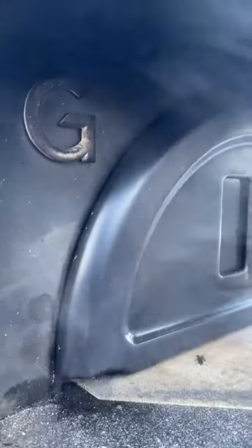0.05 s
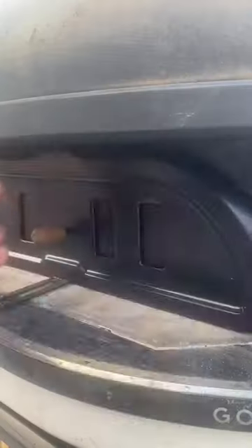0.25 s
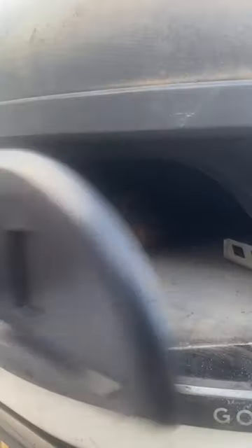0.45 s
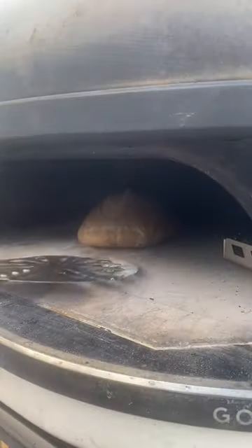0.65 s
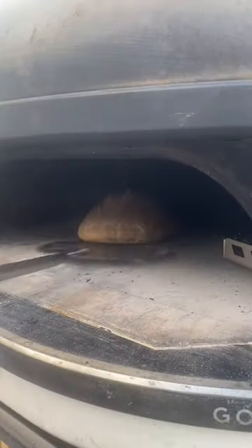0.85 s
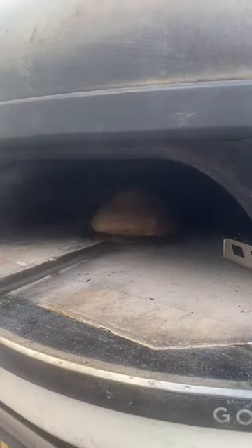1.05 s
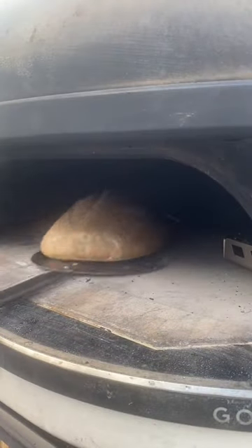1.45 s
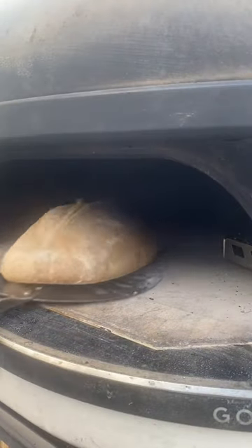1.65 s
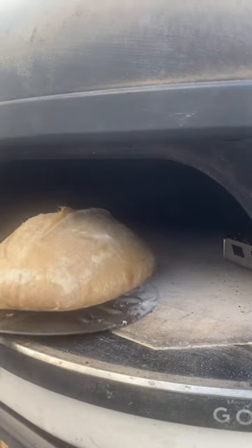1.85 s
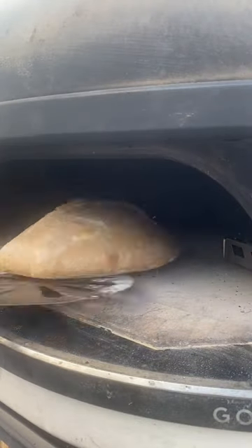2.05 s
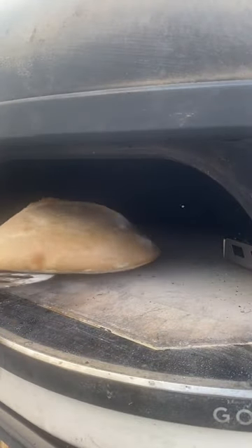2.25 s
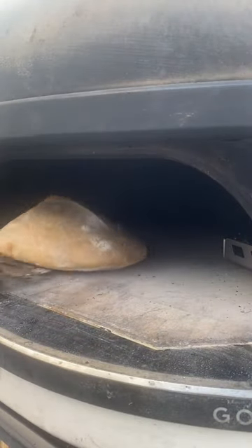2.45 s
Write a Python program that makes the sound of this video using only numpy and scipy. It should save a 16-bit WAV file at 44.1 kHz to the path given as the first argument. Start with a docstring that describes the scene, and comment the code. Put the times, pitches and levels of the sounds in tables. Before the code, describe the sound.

Close to an outdoor oven's mouth, metal rasps over stone: first the door, slipping free with a knock and hollow boom, then a peel that slides in, rattles and scrapes back out with bread, cracking crumbs over a low rumble.

```python
"""A sheet-metal door rasps off the stone mouth of an outdoor oven, slips free and rings as it lifts away.
At 0.5 s a metal peel touches down with a faint ring and hisses in over the stone floor.
Around 1.2 s it rattles under a loaf, then drags it out, cracking crumbs and squeaking briefly.
All along, the oven's hollow shell rumbles and booms under the blows, over a low murmur of air;
two closely spaced microphone ports listen at its mouth."""
import sys
import numpy as np
from scipy import signal
from scipy.fft import rfft, irfft
from scipy.io import wavfile
from scipy.ndimage import uniform_filter1d, map_coordinates

SR = 44100
rng = np.random.default_rng(int(sys.argv[2]) if len(sys.argv) > 2 else 0)


def file_out(sig):
    """Save sig as 16-bit WAV at sys.argv[1]."""
    # one column per channel
    cols = np.atleast_2d(sig).T
    # limit, then scale
    lim = np.clip(cols, -1, 1)
    pcm = np.round(lim * 32767).astype(np.int16)
    wavfile.write(sys.argv[1], SR, pcm)


N = 110250
FFT_SIZE = 2 ** 17

# tone of the outdoor air: freq_hz, gain_db
AIR_EQ = [(20, -11.5), (55, 0), (130, -5.5), (300, -14.5), (900, -16.5), (2500, -37.5), (16000, -57)]
# the shell's rumble under the sliding: time_s, level_db
RUMBLE = [(.18, -64.5), (.26, -35.5), (.36, -49.5), (.39, -25.5), (.44, -30.5), (.5, -49), (.58, -46.5),
          (.66, -75), (.76, -60.5), (.85, -50), (1.0, -42.5), (1.1, -61.5), (1.15, -56), (1.23, -42.5),
          (1.33, -39), (1.43, -54.5), (1.55, -56), (1.62, -46), (1.82, -50), (2.0, -61.5), (2.5, -55)]
# heavy blows on the shell: start_s, level_db
THUDS = [(.392, -13.5), (.426, -22.5), (0.98, -27), (1.304, -31.5), (1.594, -34), (1.689, -30.5),
         (1.814, -45)]
# the shell's boom: pitch_hz, gain_db, t60_s
SHELL_RING = [(94.5, -5, 0.17), (134.3, -20, 0.19), (168.7, 1.5, 0.15), (189.5, -12.5, 0.18)]

# light sliding before the door is pulled: start_s, end_s, level_db
FIRST_SLIDE = (0.0, 0.39, -51)
# door dragging on stone: time_s, rasp_db, grind_db
DOOR_DRAG = [(0.19, -54.5, -59.5), (0.206, -39, -46.5), (0.238, -33, -41), (0.256, -26.5, -31.5),
             (0.3, -23.5, -33), (0.358, -16, -42.5), (0.372, -31.5, -39.5), (0.39, -19, -20),
             (0.409, -34, -34.5), (0.427, -23, -30), (0.445, -36.5, -36.5), (0.52, -63.5, -60)]
# bright rasp of the door's edge: freq_hz, gain_db
DOOR_RASP_EQ = [(600, -20.5), (1700, -10.5), (2200, -1), (3000, -1), (3800, -0.5), (4800, -5.5), (7000, -8),
                (10500, -14.5), (12500, -23), (16000, -30.5)]
# low grind of its panel: freq_hz, gain_db
DOOR_GRIND_EQ = [(100, -32), (260, -6), (600, -7), (1100, -8), (1700, -2), (2400, -11), (5000, -37.5)]
# sheet-metal resonances: freq_hz, width_hz, boost_db
DOOR_MODES = [(1020, 21, 12.2), (1253, 19, 9.9), (2114, 150, 2.6), (2940, 79, 6), (3565, 46, 7),
              (3650, 46, 3.4), (3950, 17, 8.4), (4350, 87, 3.9), (7000, 79, 3.9)]
# door knocks: start_s, level_db, t60_s
DOOR_KNOCKS = [(.078, -36, 0.084), (.202, -24.5, 0.033), (.3612, -7, 0.012), (.3935, -17.5, 0.022),
               (.4215, -17.5, 0.029)]
# tone of those knocks: freq_hz, gain_db
DOOR_KNOCK_EQ = [(100, -14), (700, -4.5), (1800, -1.5), (3000, -3.5), (4500, -9.5), (6000, 0),
                 (10000, -3.5), (15000, -18)]
# shriek of the edge slipping free: pitch_hz, level_db, t60_s
RELEASE_RING = [(2920, 3, 0.009), (3170, -13, 0.022), (2256, -18, .025)]
# door ringing in the hand: pitch_hz, level_db, t60_s
LIFT_RING = [(1020, -55.5, 0.81), (1560, -40.5, .22), (1950, -33, 0.18)]

# empty peel touching down: pitch_hz, level_db, t60_s
TOUCH_RING = [(237, -51, .5), (818, -58, 1.1), (1880, -60, 1.0), (3260, -57, 1.5), (4070, -55, 1.3)]
# peel going in: time_s, hiss_db, rasp_db
PEEL_PUSH = [(0.525, -48, -72), (0.537, -44.5, -55.5), (0.65, -42.5, -54.5), (0.72, -37, -59.5),
             (0.764, -29, -50), (0.773, -33, -31.5), (0.83, -29.5, -28.5), (0.9, -31.5, -28.5),
             (0.93, -36, -37.5), (0.99, -38.5, -41.5), (1.03, -53.5, -48.5), (1.08, -85, -82)]
# bright hiss of the skimming blade: freq_hz, gain_db
PUSH_HISS_EQ = [(800, -35), (2500, -12), (4000, -8), (5200, -2), (6800, -2), (8500, -3), (10900, -5),
                (11900, -13), (15500, -16)]
# rasp of the biting blade: freq_hz, gain_db
PUSH_RASP_EQ = [(150, -47), (400, -11), (1100, -11), (1650, -4), (2300, 2), (3800, 2), (5000, -0.5),
                (8000, -31)]
# empty blade's resonances: freq_hz, width_hz, boost_db
EMPTY_PEEL_MODES = [(470, 40, 8), (1672, 45, 5), (2760, 70, 3), (3400, 90, 3), (6050, 110, 4)]

# peel knocks: start_s, level_db, t60_s
PEEL_KNOCKS = [(.975, -40, 0.21), (1.160, -37.5, 0.081), (1.195, -41.5, .04), (1.217, -34, 0.062),
               (1.241, -33.5, 0.046), (1.266, -31.5, 0.026), (1.298, -31, 0.11), (1.362, -41.5, 0.08),
               (1.458, -41, 0.087), (1.537, -44, 0.091), (2.05, -39.5, 0.022)]
# tone of those knocks: freq_hz, gain_db
PEEL_KNOCK_EQ = [(100, -4), (400, 2), (820, 4.5), (1120, -0.5), (1650, 4), (3000, -4.5), (7000, -9.5),
                 (15000, -40)]
# blade chattering under the loaf: start_s, end_s, bounce_db
RATTLE = (1.205, 1.325, -42)
# blade's hollow ring, relative to its knock: pitch_hz, gain_db, t60_s
BLADE_RING = [(452, -9, 0.13), (733, -5.5, 0.15), (858, -8, .12)]
# loaded peel coming out: time_s, hiss_db, grind_db
PEEL_PULL = [(1.152, -86, -100), (1.163, -58, -47), (1.268, -46.5, -45.5), (1.282, -50.5, -62),
             (1.32, -40, -44), (1.345, -46.5, -51), (1.401, -42, -57), (1.458, -41.5, -49.5),
             (1.508, -42, -52.5), (1.556, -43, -43.5), (1.598, -36.5, -49), (1.699, -39, -51),
             (1.8, -39.5, -46.5), (1.934, -40.5, -42.5), (2.014, -50.5, -70), (2.057, -40.5, -49),
             (2.086, -54, -51), (2.108, -44.5, -40), (2.15, -36, -44.5), (2.189, -41.5, -50.5),
             (2.29, -35, -40.5), (2.382, -34.5, -42.5), (2.429, -42.5, -41.5), (2.495, -34, -38)]
# hiss of metal drawn over stone: freq_hz, gain_db
PULL_HISS_EQ = [(900, -30), (2200, -6), (4500, -.5), (7000, -1), (10700, -5), (12300, -15), (15500, -19)]
# grind under the loaf's weight: freq_hz, gain_db
PULL_GRIND_EQ = [(120, -25.5), (300, -7), (800, -0.5), (1500, 2), (2200, 2.5), (4000, -6), (8000, -46)]
# loaded blade's resonances: freq_hz, width_hz, boost_db
LOADED_PEEL_MODES = [(490, 70, 7), (733, 46, 7), (1610, 74, 3), (4420, 450, 4), (7000, 350, 2.5)]
# crumbs cracking under the blade: start_s, level_db, t60_s
CRUMBS = [(1.366, -27.5, 0.024), (1.494, -27, 0.017), (1.7445, -20.5, 0.012), (2.095, -32, 0.02)]
# the blade catching and singing: peak_s, level_db, half_length_s, pitch_hz
SQUEAKS = [(0.736, -53, 0.027, 454), (1.673, -42.5, 0.045, 4460), (2.105, -33.5, 0.0066, 5350),
           (2.14, -33, 0.012, 5426), (2.216, -37.5, 0.0051, 5390), (2.228, -40.5, 0.01, 1620),
           (2.385, -39.5, 0.0069, 3130), (2.457, -42, 0.025, 2750)]
# partials of a squeak: pitch_ratio, width_hz, gain_db
SQUEAK_PARTIALS = [(1.001, 124, -2.5), (1.219, 145.5, -7), (1.86, 396, -20)]

# phase between the ports: freq_hz, left_lead_rad
PORT_PHASE = [(120, 0), (400, -.3), (780, -.55), (1500, 0), (2000, .05), (2800, .75), (3800, .4),
              (4900, 1.9), (5600, 1.6), (7000, 2.3), (8100, np.pi), (12600, np.pi), (14000, 3.9),
              (15100, 6.1)]
# stereo balance: freq_hz, left_over_right_db
BALANCE = [(150, 0), (600, 2), (1600, 0), (2900, -2), (5600, .4), (7800, 0)]
# stereo width, with almost no diffuse sound from 8.4 to 12 kHz: freq_hz, diffuse_over_direct_db
STEREO_WIDTH = [(130, -32), (500, -16), (1000, -16), (1800, -18), (2800, -9), (5500, -4), (7300, -8),
                (8400, -45), (12000, -45), (13800, -2), (15500, -10)]

AIR_DB, THUD_ATTACK_S = -58, .011
RELEASE_S, LIFT_S = .3612, .43
TOUCH_S, TOUCH_WAVER_DB = .535, 3
CAVITY_T60_S, DRIFT_PER_S = .075, 14
LOW_CUT_HZ, TOP_HZ = 24, 15800


def amp(db):
    """Decibels to gain."""
    return 10 ** (np.asarray(db) / 20)


def unit(x):
    """Scale to rms 1."""
    return x / np.sqrt(np.mean(x ** 2) + 1e-20)


def clock():
    """Time of each sample."""
    return np.arange(N) / SR


def bin_hz():
    """Frequency of each filter bin."""
    return np.fft.rfftfreq(FFT_SIZE, 1 / SR)


def curve(points):
    """(freq_hz, value) points joined on a log axis."""
    hz, values = np.transpose(points)
    return np.interp(np.log(bin_hz() + 1), np.log(hz + 1), values)


def faders(rows):
    """One gain envelope per dB column, silent outside the rows."""
    times, *columns = np.transpose(rows)
    return [amp(np.interp(clock(), times, db, left=-120, right=-120)) for db in columns]


def wobble(rate):
    """A smooth random curve, rate knots a second."""
    return map_coordinates(rng.standard_normal(4096), [clock() * rate], mode="wrap")


def body(x, eq, modes=()):
    """A ringing body: a broad EQ with resonances standing out of it; rms 1."""
    peaks = sum((amp(db) ** 2 - 1) / (1 + (2 * (bin_hz() - hz) / width) ** 2) for hz, width, db in modes)
    gain = amp(curve(eq)) * np.sqrt(1 + peaks)
    cepstrum = irfft(np.log(np.maximum(np.nan_to_num(gain), 1e-6)))
    cepstrum[1:FFT_SIZE // 2] *= 2  # minimum phase: the ring follows the hit
    cepstrum[FFT_SIZE // 2 + 1:] = 0
    return unit(irfft(rfft(x, FFT_SIZE) * np.exp(rfft(cepstrum)))[:N])


def friction(rate, spread_db, flutter_db, flutter_rate):
    """Tiny slips of metal over grit, about rate a second, bunched by an uneven grip."""
    slips = (rng.random(N) < rate / SR) * rng.choice([-1, 1], N)
    sizes = amp(spread_db * rng.standard_normal(N).clip(-2, 1))
    grip = amp(flutter_db * wobble(flutter_rate).clip(-2, 1))
    return unit(slips * sizes * grip)


def travel(x, depth_db):
    """A moving contact favours ever different plate modes; rms 1."""
    spectra = signal.stft(x, SR, nperseg=1024)[2]
    shimmer = uniform_filter1d(rng.standard_normal(spectra.shape), size=3, axis=0)
    shimmer = unit(uniform_filter1d(shimmer, size=6, axis=1))
    return unit(signal.istft(spectra * amp(depth_db * shimmer), SR, nperseg=1024)[1][:N])


def decay(start, t60, attack_s):
    """Envelope of a blow."""
    age = np.maximum(clock() - start, 0)
    return 10 ** (-3 * age / t60) * (1 - np.exp(-age / attack_s))


def knocks(rows, eq, modes):
    """Short gritty contacts ringing a body."""
    envelope = sum(amp(db) * decay(start, t60, attack_s=.0018) for start, db, t60 in rows)
    force = envelope * rng.standard_normal(N)
    return np.std(force) * body(force, eq, modes)


def ring(start, modes, attack_s):
    """Damped modes set off by one blow."""
    age = clock() - start
    return sum(amp(db) * decay(start, t60, attack_s) * np.sin(2 * np.pi * hz * age)
               for hz, db, t60 in modes)


def air():
    """A low, steady bed of outdoor air."""
    return amp(AIR_DB) * body(rng.standard_normal(N), AIR_EQ)


def shell():
    """The hollow oven rumbles under the sliding and booms at the heavier blows."""
    level, = faders(RUMBLE)
    hollow_eq = [(25, -53.5), (60, -5), (95, -10), (130, 7), (165, -1.5), (200, -8), (250, -21),
                 (500, -50.5)]
    rumble = level * body(rng.standard_normal(N), hollow_eq)
    booms = sum(amp(db) * ring(start, SHELL_RING, THUD_ATTACK_S) for start, db in THUDS)
    return rumble + booms


def first_slide():
    """A faint even hiss of metal easing over the stone."""
    start, end, db = FIRST_SLIDE
    held = np.interp(clock(), [start, end, end + .03], [1, 1, 0])
    slips = friction(rate=26000, spread_db=1.5, flutter_db=1.8, flutter_rate=130)
    return amp(db) * held * body(slips, PULL_HISS_EQ)


def door():
    """The door's edge rasps ever harder over the stone, slips free, knocks and rings on."""
    rasp, grind = faders(DOOR_DRAG)
    fine = friction(rate=10000, spread_db=1, flutter_db=1, flutter_rate=220)
    coarse = friction(rate=2000, spread_db=2.5, flutter_db=0, flutter_rate=150)
    edge = rasp * travel(body(fine, DOOR_RASP_EQ, DOOR_MODES), depth_db=2.4)
    panel = grind * travel(body(coarse, DOOR_GRIND_EQ, DOOR_MODES), depth_db=5.5)
    bumps = knocks(DOOR_KNOCKS, DOOR_KNOCK_EQ, DOOR_MODES)
    shriek = ring(RELEASE_S, RELEASE_RING, attack_s=.001)
    lift = ring(LIFT_S, LIFT_RING, attack_s=.002)
    return edge + panel + bumps + shriek + lift


def squeaks():
    """Now and then the blade catches and sings in narrow bands of noise."""
    f, out = bin_hz(), np.zeros(N)
    for peak, db, half_length, hz in SQUEAKS:
        response = sum(amp(gain_db) * 1j * f * width / ((ratio * hz) ** 2 - f * f + 1j * f * width)
                       for ratio, width, gain_db in SQUEAK_PARTIALS)
        tone = signal.hilbert(irfft(rfft(rng.standard_normal(FFT_SIZE)) * response))[:N]
        compressed = unit(tone.real / np.sqrt(abs(tone)))
        swell = np.exp(-.5 * ((clock() - peak) / half_length) ** 2)
        out += amp(db) * swell * compressed
    return out


def rattle(count, detune):
    """Each knock and each small bounce under the loaf rings the blade a little differently."""
    start, end, bounce_db = RATTLE
    times = start + (end - start) * (np.arange(count) + rng.random(count)) / count
    hits = [row[:2] for row in PEEL_KNOCKS] + [(time, bounce_db) for time in times]
    out = np.zeros(N)
    for time, db in hits:
        modes = [(hz * (1 + detune * rng.standard_normal()), db + gain + 2 * rng.standard_normal(), t60)
                 for hz, gain, t60 in BLADE_RING]
        out += ring(time, modes, attack_s=.0017)
    return out


def peel_in():
    """The empty blade touches down ringing, skims with a bright hiss, then bites and rasps."""
    hiss, rasp = faders(PEEL_PUSH)
    fine = friction(rate=16000, spread_db=-3, flutter_db=1.5, flutter_rate=89)
    coarse = friction(rate=7000, spread_db=2.5, flutter_db=.5, flutter_rate=140)
    # the stone damps each mode unevenly
    touch = sum(ring(TOUCH_S, [mode], attack_s=.0021) * amp(TOUCH_WAVER_DB * wobble(30))
                for mode in TOUCH_RING)
    skim = hiss * travel(body(fine, PUSH_HISS_EQ, EMPTY_PEEL_MODES), depth_db=5)
    bite = rasp * travel(body(coarse, PUSH_RASP_EQ, EMPTY_PEEL_MODES), depth_db=3)
    return touch + skim + bite


def peel_out():
    """The blade judders under the loaf and drags it out over flour and crumbs."""
    hold_to_end = (N / SR + .05, *PEEL_PULL[-1][1:])
    hiss, grind = faders(PEEL_PULL + [hold_to_end])
    fine = friction(rate=10000, spread_db=1, flutter_db=1.9, flutter_rate=120)
    coarse = friction(rate=2500, spread_db=3.5, flutter_db=1, flutter_rate=59)
    crumbs = knocks(CRUMBS, PUSH_HISS_EQ, LOADED_PEEL_MODES)
    skim = hiss * travel(body(fine, PULL_HISS_EQ, LOADED_PEEL_MODES), depth_db=3)
    weight = grind * travel(body(coarse, PULL_GRIND_EQ, LOADED_PEEL_MODES), depth_db=4.5)
    chatter = rattle(count=12, detune=.008)
    bumps = knocks(PEEL_KNOCKS, PEEL_KNOCK_EQ, LOADED_PEEL_MODES)
    return skim + weight + crumbs + chatter + bumps


def ports(x):
    """Direct sound reaches the two ports out of step; a diffuse, drifting echo widens the image."""
    direct = rfft(x, FFT_SIZE)
    tail = rfft(rng.standard_normal(N) * decay(0, CAVITY_T60_S, attack_s=.00033), FFT_SIZE)
    echo = signal.hilbert(irfft(direct * tail / np.sqrt(np.mean(abs(tail) ** 2))))[:N]
    diffuse = (echo * np.exp(2j * wobble(DRIFT_PER_S))).real  # drifts as the metal moves
    width = amp(curve(STEREO_WIDTH))
    side = np.array([[1], [-1]])  # left, right
    pair = (direct + side * width * rfft(diffuse, FFT_SIZE)) / np.sqrt(1 + width ** 2)
    pan = amp(side * curve(BALANCE) / 2)
    phase = np.exp(.5j * side * curve(PORT_PHASE))
    return irfft(pair * pan * phase)[:, :N]


def scene():
    """Door, push and pull in stereo, each with its own echo; shell and air share the pull's."""
    bed = air()
    opening = ports(first_slide() + door())
    push = ports(peel_in())
    pull_and_background = ports(peel_out() + squeaks() + shell() + bed)
    return opening + push + pull_and_background


def record(dry):
    """The microphone rolls off the deepest bass; everything above TOP_HZ is cut."""
    f = bin_hz()
    low_cut = f ** 2 / np.sqrt(f ** 4 + LOW_CUT_HZ ** 4)
    return irfft(rfft(dry, FFT_SIZE) * low_cut * (f < TOP_HZ))[:, :N]


dry = scene()
out = record(dry)
file_out(out)
```